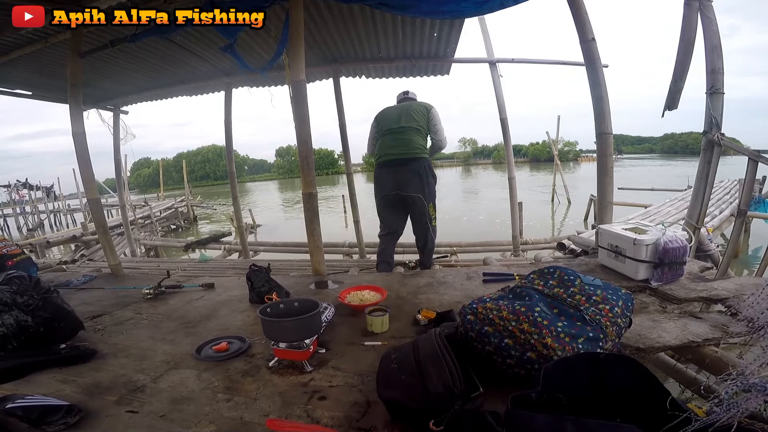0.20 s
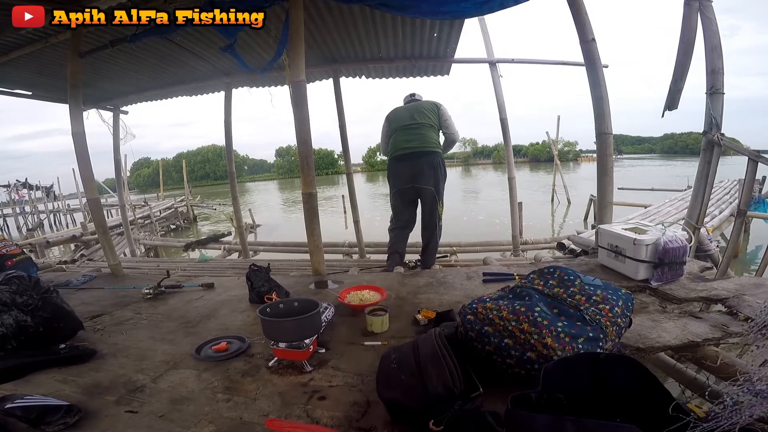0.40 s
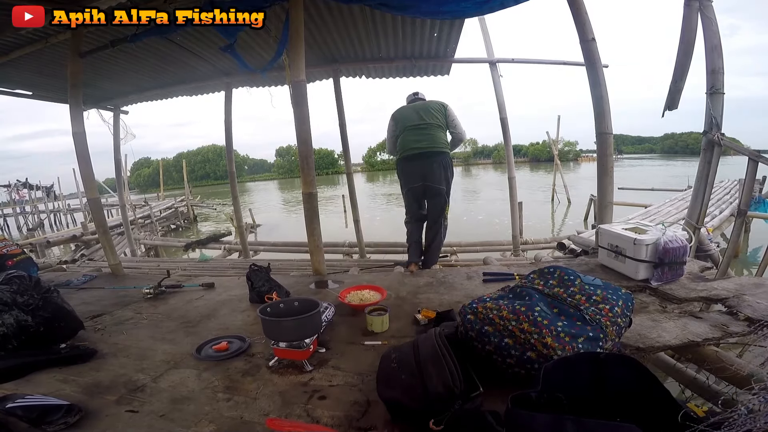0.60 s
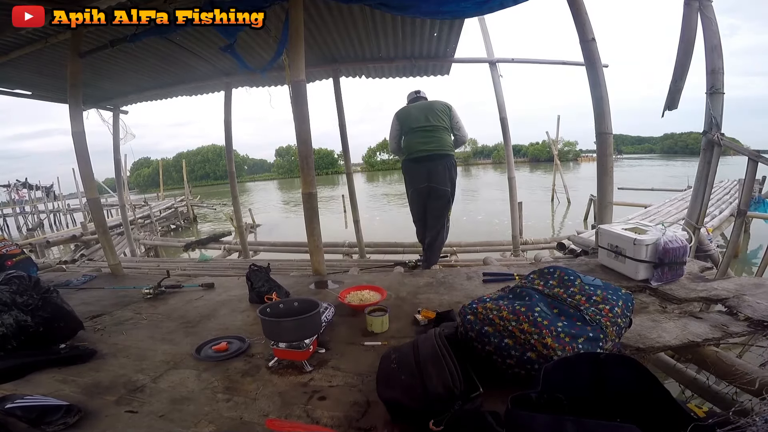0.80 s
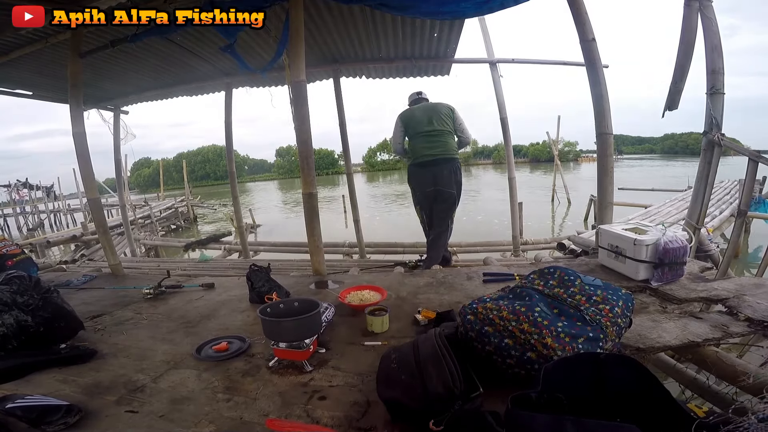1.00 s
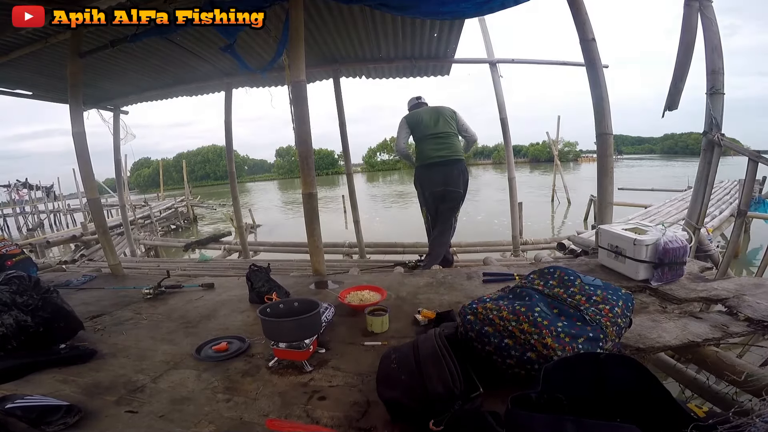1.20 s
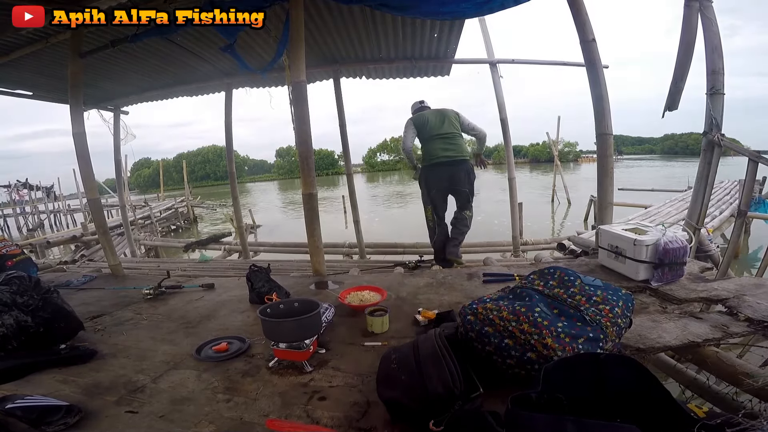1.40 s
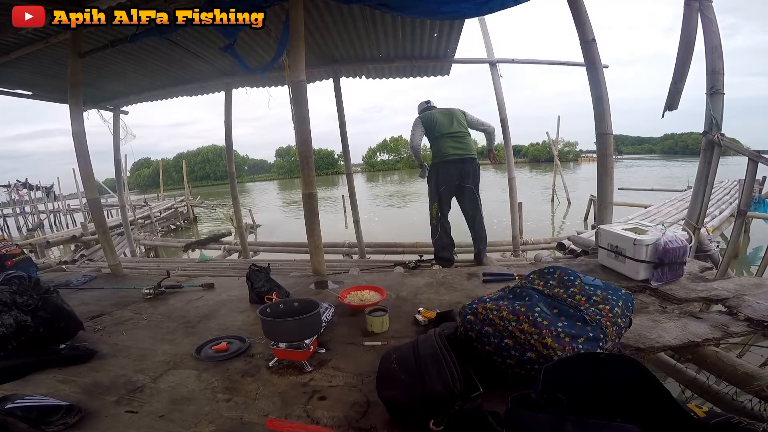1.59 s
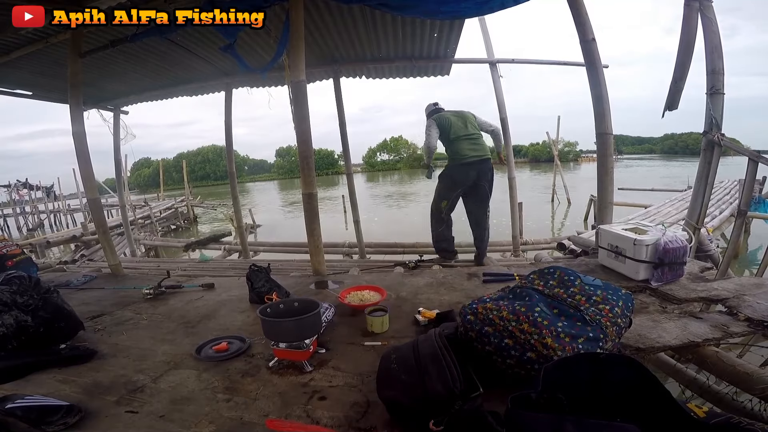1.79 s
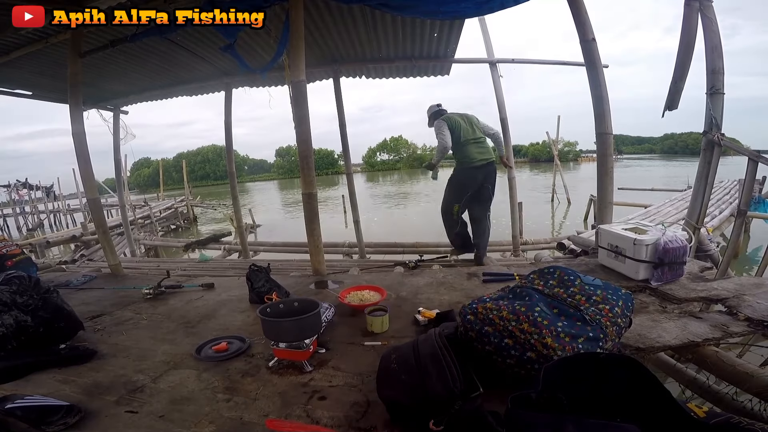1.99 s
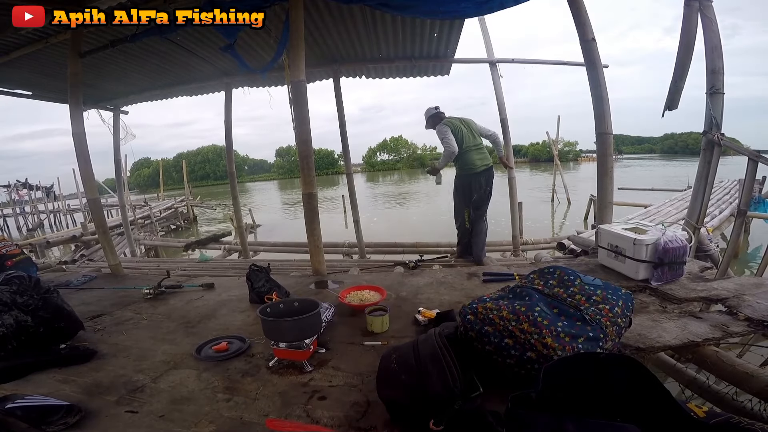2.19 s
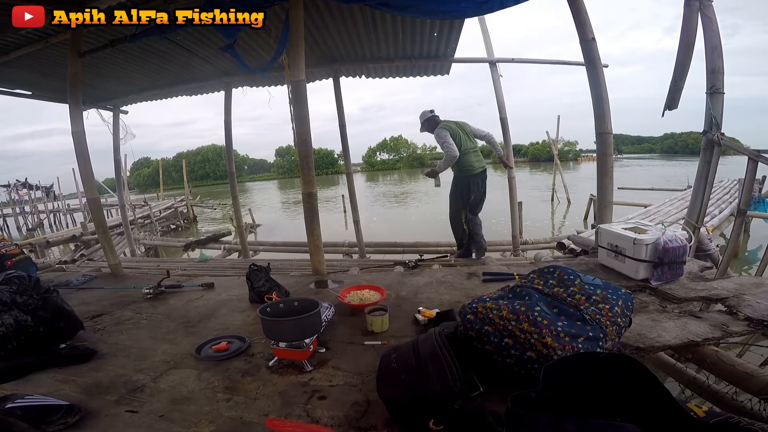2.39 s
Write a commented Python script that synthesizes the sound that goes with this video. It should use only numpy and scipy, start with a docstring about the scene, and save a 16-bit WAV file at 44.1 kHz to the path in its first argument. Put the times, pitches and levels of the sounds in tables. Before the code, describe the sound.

Heavy footsteps thud and creak on a loose bamboo and plank deck over low outdoor rumble

```python
"""Creaks and footfalls on a bamboo and plank platform, over a continuous low outdoor rumble of varying level.
Each footfall excites decaying modes of beams, planks and poles; the loose deck shudders as banded noise.
Dry slats creak by stick-slip: sparse random impulses and a dense ring, with hollow canes knocking.
Swelling noise makes scuffs, rubs, groans and flexes as the weight moves.
Behind lie soft air, a faint regular ticking and the thin whine of a camera."""
import sys
import numpy as np
from scipy import signal
from scipy.fft import rfft, irfft
from scipy.io import wavfile
from scipy.ndimage import uniform_filter1d

SR = 44100
rng = np.random.default_rng(int(sys.argv[2]) if len(sys.argv) > 2 else 0)


def log_audio(samples):
    """Write samples as a 16-bit WAV file to the path given in sys.argv[1]."""
    # one column per channel
    frames = np.atleast_2d(samples).T
    # limit to full scale, then quantise
    limited = np.clip(frames, -1, 1)
    pcm = np.round(limited * 32767).astype(np.int16)
    wavfile.write(sys.argv[1], SR, pcm)


N = 105840
T = np.arange(N) / SR  # time in seconds
SHORT_SAMPLES, STEP_SAMPLES = 16384, 65536  # lengths of a creak or tick, and of a footfall


def footfalls():
    """Modal superposition: each step excites beams, planks, poles and the loose deck in its own shares."""
    # Each row: start in seconds, then levels of beam sway, plank boom, pole ring and deck shudder in dB.
    steps = [(0.2, -18, -24.5, -52, -28), (0.285, -27, -35, -62.5, -33), (0.76, -13.5, -22, -35, -28),
             (0.905, -24.5, -36, -63, -31.5), (1.492, -44.5, -38, -55.5, -42)]
    # Modes of the beams, planks and poles.
    # Each row: frequency in Hz, relative level in dB, decay time t60 in seconds, swell time in seconds.
    beam_modes = [(27.67, 5, 0.99, 0.033), (42.1, -13.5, 0.99, 0.053), (62.7, -10, 0.7, 0.06)]
    plank_modes = [(107.7, -2.5, 0.48, 0.0092), (122.13, -1, 0.72, 0.0128), (128.04, -6, 0.64, 0.016),
                   (150.35, -10.5, 0.61, 0.0061)]
    pole_modes = [(247.7, 2, 0.45, 0.015), (256.1, 0, 0.512, .014), (286, -2, 0.11, 0.006),
                  (355, -10.5, 0.21, .01), (423, -10, 0.33, .01)]
    # Spectrum of the loose deck. Each row: frequency in Hz, relative density in dB per Hz.
    shudder_spectrum = [(8, -46), (22, -3.5), (45, 8), (66, 5.5), (85, -13), (125, 2), (180, -22),
                        (300, -22.5), (470, -32.5), (800, -36.5), (2000, -59)]
    # Damping of the loose deck. Each row: band centre in Hz, decay time t60 in seconds.
    shudder_t60s = [(30, 3.3), (120, 1.2), (200, 0.38), (450, 0.53), (2000, 0.61)]
    shudder_rise_s = 0.013

    out, t = np.zeros(N), T[:STEP_SAMPLES]
    beams, planks, poles = ring(t, beam_modes), ring(t, plank_modes), ring(t, pole_modes)
    onset = 1 - np.exp(-t / shudder_rise_s)
    for start, sway_db, boom_db, pole_db, shudder_db in steps:
        shudder = dense_ring(t, shudder_spectrum, shudder_t60s) * onset
        step = amp(sway_db) * beams + amp(boom_db) * planks + amp(pole_db) * poles
        add(out, start, step + amp(shudder_db) * shudder)
    return out


def ring(t, modes):
    """Damped modal response: each low sine swells as the weight lands, then decays exponentially."""
    out = np.zeros(len(t))
    for hz, db, t60, swell in modes:
        envelope = (1 - np.exp(-(t / swell) ** 2)) * fade(t, t60)
        out += amp(db) * envelope * np.sin(2 * np.pi * hz * t)
    return out


def dense_ring(t, spectrum, t60s):
    """High modal density: many close modes act as noise whose bands decay at their own rates."""
    f = np.fft.rfftfreq(len(t), 1 / SR)
    centres, times = np.transpose(t60s)
    bins = rfft(noise(spectrum, size=len(t)))
    out = np.zeros(len(t))
    for t60, share in zip(times, np.eye(len(times))):
        # Neighbouring bands cross-fade, so their shares sum to one.
        weight = read(list(zip(centres, share)), f)
        out += irfft(bins * weight, len(t)) * fade(t, t60)
    return out


def creaks():
    """Stick-slip friction: irregular slips snap through the dry slats and knock the hollow canes."""
    # Each row: start in seconds, rise in seconds, slat level in dB, added treble in dB, knock level in dB.
    creak_rows = [(0.106, .003, -57, 0, -71), (0.149, 0.0023, -58.5, -2, -74),
                  (0.186, 0.0023, -51, -6, -52.5), (0.1937, .002, -45.5, -8.5, -47.5),
                  (0.757, 0.0059, -42.5, -1.5, -46), (0.7643, 0.00147, -38, -0.5, -46),
                  (0.777, 0.0049, -57, -9.5, -54.5), (1.480, 0.017, -60, -4, -52.5)]
    # Spectrum of the slats. Each row: frequency in Hz, relative density in dB per Hz.
    slat_spectrum = [(250, -11), (600, 1.5), (950, -8), (1530, 4), (1850, -3), (2300, 3), (3050, -6.5),
                     (3500, 3.5), (3900, 9), (4250, -8.5), (5700, -10), (7200, -13.5), (9000, -25.5),
                     (14000, -42)]
    # Damping of the slats. Each row: band centre in Hz, decay time t60 in seconds.
    slat_t60s = [(400, 0.27), (1500, .11), (3700, 0.14), (6000, .1), (12000, 0.12)]
    # Modes of the hollow canes. Each row: frequency in Hz, relative level in dB, decay time t60 in seconds.
    cane_modes = [(320, -9, 0.11), (413.4, -5.5, 0.2), (450, -1.5, 0.14), (484.7, -1.5, 0.23),
                  (526, -17, 0.18), (695, -15, .1)]
    slips_per_s, slip_spread_db = 460, 4  # mean rate, standard deviation of size
    snap_db, snap_t60_s = 0, 0.035  # direct snaps relative to the ring
    treble_from_hz = 4100

    out, t = np.zeros(N), T[:SHORT_SAMPLES]
    for start, rise, db, treble_db, knock_db in creak_rows:
        spectrum = [(hz, level + treble_db * (hz > treble_from_hz)) for hz, level in slat_spectrum]
        sizes = amp(slip_spread_db * rng.standard_normal(len(t)))
        signed_sizes = sizes * rng.choice([-1, 1], len(t))
        slips = (rng.random(len(t)) < slips_per_s / SR) * signed_sizes
        snaps = amp(snap_db) * unit(colour(slips, spectrum)) * fade(t, snap_t60_s)
        slats = dense_ring(t, spectrum, slat_t60s)
        knock = np.zeros(len(t))
        for hz, mode_db, t60 in cane_modes:
            phase = rng.random()  # in cycles
            knock += amp(mode_db) * fade(t, t60) * np.sin(2 * np.pi * (hz * t + phase))
        add(out, start, np.minimum(t / rise, 1) * (amp(db) * (snaps + slats) + amp(knock_db) * knock))
    return out


def shifting():
    """Sum of the sliding and bending sounds made as the weight moves."""
    return scuffs() + rubs() + groans() + flexes()


def scuffs():
    """Sliding friction: broadband noise with a random grain as the soles scuff."""
    # Each row: start in seconds, length in seconds, level in dB.
    scuff_rows = [(0.11, 0.052, -63), (0.715, 0.062, -66), (1.015, 0.017, -63), (1.398, 0.037, -59.5),
                  (1.83, 0.12, -70)]
    # Each row: frequency in Hz, relative density in dB per Hz.
    scuff_spectrum = [(500, -34), (1300, 5), (2200, -10), (2900, -8), (3700, 3), (4400, -6), (8000, -17),
                      (14000, -35)]
    grain_db = 4.5  # standard deviation of the grain's level
    slow_noise = unit(uniform_filter1d(rng.standard_normal(N), size=120))
    grain = unit(amp(grain_db * slow_noise))
    return swells(scuff_rows, noise(scuff_spectrum) * grain)


def rubs():
    """Rubbing friction: pole on pole gives dull filtered noise."""
    # Each row: start in seconds, length in seconds, level in dB.
    rub_rows = [(0.29, 0.097, -62.5), (0.70, 0.098, -60.5), (0.96, 0.17, -66.5)]
    # Each row: frequency in Hz, relative density in dB per Hz.
    rub_spectrum = [(200, -20), (400, -8), (530, 2), (680, -1.5), (900, -16), (2000, -29)]
    return swells(rub_rows, noise(rub_spectrum))


def groans():
    """Narrow-band resonance: the deck groans under the weight around one pitch."""
    # Each row: start in seconds, length in seconds, level in dB.
    groan_rows = [(0.3, .48, -62.5)]
    return swells(groan_rows, narrow_noise(hz=255.7, width_hz=18))


def flexes():
    """Bending resonance: planks flex as the weight moves, giving a low narrow band of noise."""
    # Each row: start in seconds, length in seconds, level in dB.
    flex_rows = [(0.08, 0.14, -46.5), (0.39, 0.15, -39.5), (0.61, 0.13, -48.5), (0.69, 0.17, -35.5),
                 (1.24, 0.11, -49.5), (1.61, .1, -45)]
    return swells(flex_rows, narrow_noise(hz=118, width_hz=20.6))


def swells(rows, sound):
    """Amplitude modulation: a steady sound rises and falls in one half-sine arch per row."""
    envelope = np.zeros(N)
    for start, length, db in rows:
        envelope += amp(db) * np.sin(np.pi * np.clip((T - start) / length, 0, 1))
    return sound * envelope


def ticking():
    """Periodic excitation: seven times a second a quick high ping sounds with a slower, soft rasp."""
    # One row per tick. Each row: rasp level in dB, ping level in dB.
    tick_rows = [(-64, -68), (-55, -59), (-61, -63.5), (-58.5, -64), (-59.5, -64), (-54, -59), (-61, -58),
                 (-60.5, -64), (-60, -68), (-58.5, -67), (-59, -66), (-58.5, -63.5), (-61, -62),
                 (-58.5, -66), (-60.5, -60), (-60, -67), (-64.5, -67)]
    # Spectrum of the rasp. Each row: frequency in Hz, relative density in dB per Hz.
    rasp_spectrum = [(500, -20.5), (1000, -6.5), (1450, 1), (1800, -16), (2100, 1.5), (2750, -19),
                     (3300, -1.5), (3800, 1), (4200, -12.5), (6500, -25.5)]
    first_s, period_s = 0.0369, 0.1437
    rasp_rise_s, rasp_t60_s = 0.0089, 0.11
    ping_rise_s, ping_t60_s = 0.0029, 0.038

    rasp_level, ping_level, t = np.zeros(N), np.zeros(N), T[:SHORT_SAMPLES]
    rasp_shape = np.minimum(t / rasp_rise_s, 1) * fade(np.maximum(t - rasp_rise_s, 0), rasp_t60_s)
    ping_shape = np.minimum(t / ping_rise_s, 1) * fade(t, ping_t60_s)
    for k, (rasp_db, ping_db) in enumerate(tick_rows):
        start = first_s + k * period_s
        add(rasp_level, start, amp(rasp_db) * rasp_shape)
        add(ping_level, start, amp(ping_db) * ping_shape)
    return rasp_level * noise(rasp_spectrum) + ping_level * narrow_noise(hz=7850, width_hz=360)


def background():
    """Stationary spectra: a low outdoor rumble of varying level over steady soft air."""
    # Spectra of rumble and air. Each row: frequency in Hz, relative density in dB per Hz.
    rumble_spectrum = [(8, -29), (18, -13), (28, 2.5), (45, 2.5), (56, -11), (67, 1), (82, -21), (100, -25),
                       (122, -17.5), (150, -31.5), (200, -40.5), (400, -52.5), (900, -68)]
    air_spectrum = [(100, 4), (250, -0.5), (500, -1.5), (900, -7.5), (1500, -7), (2800, -10.5),
                    (3700, -8.5), (4500, -13.5), (7000, -16.5), (8000, -15.5), (9000, -19), (12000, -22),
                    (13500, -16), (14400, -53), (15200, -42)]
    # Each row: time in seconds, rumble level in dB.
    rumble_levels = [(0, -38.5), (0.17, -41.5), (0.45, -33), (1.4, -32), (1.75, -35.5), (2.4, -36)]
    air_db = -62
    rumble = noise(rumble_spectrum) * amp(np.interp(T, *np.transpose(rumble_levels)))
    return rumble + amp(air_db) * noise(air_spectrum)


def camera_whine():
    """Square-wave amplitude modulation: steady high tones flutter between two levels."""
    # Each row: frequency in Hz, rms level before the flutter in dB.
    whine_tones = [(6309, -82.5), (12617.4, -71.5)]
    flutter_hz, flutter_depth = 30, 0.2
    flutter = 1 + flutter_depth * signal.square(2 * np.pi * flutter_hz * T)
    tones = sum(amp(db) * np.sqrt(2) * np.sin(2 * np.pi * hz * T) for hz, db in whine_tones)
    return flutter * tones


def amp(db):
    """Logarithmic level: decibels to amplitude gain."""
    return 10 ** (np.asarray(db) / 20)


def unit(x):
    """Energy normalization: scales to an rms of one."""
    return x / np.sqrt(np.mean(x ** 2) + 1e-20)


def read(points, hz):
    """Logarithmic frequency scale: interpolates a table along it."""
    f, value = np.transpose(points)
    return np.interp(np.log(hz + 1), np.log(f + 1), value)


def add(mix, start, sound):
    """Linear superposition: mixes a sound in at a time in seconds."""
    part = mix[max(round(start * SR), 0):][:len(sound)]
    part += sound[:len(part)]


def fade(t, t60):
    """Exponential damping: the level falls by 60 dB in t60 seconds."""
    return np.exp(-np.log(1000) * t / t60)


def colour(x, spectrum):
    """Linear filtering: weights each frequency by the given spectrum."""
    gain = amp(read(spectrum, np.fft.rfftfreq(len(x), 1 / SR)))
    return irfft(rfft(x) * gain, len(x))


def noise(spectrum, size=N):
    """Stationary random process: filtered white noise of unit rms."""
    return unit(colour(rng.standard_normal(size), spectrum))


def narrow_noise(hz, width_hz):
    """Resonant filtering: white noise passed through one steep resonance."""
    off = (np.fft.rfftfreq(N, 1 / SR) - hz) / width_hz
    return unit(irfft(rfft(rng.standard_normal(N)) / (1 + (2 * off) ** 2), N))


def scene():
    """Linear superposition of the platform and its surroundings."""
    return (footfalls() + creaks() + shifting() + ticking() + background())[None]


def record(dry):
    """Band limitation: the camera whine joins the scene and a linear-phase low-pass removes the top."""
    cutoff_hz = 15100
    lowpass = signal.firwin(511, cutoff_hz, window=("kaiser", 9), fs=SR)
    padded = np.pad(dry[0] + camera_whine(), len(lowpass) // 2, "edge")
    return signal.oaconvolve(padded, lowpass, "valid")[None]


dry = scene()
out = record(dry)
log_audio(out)
```